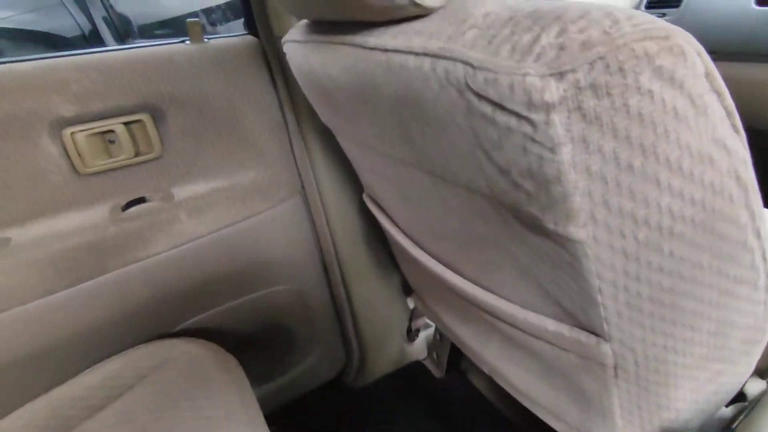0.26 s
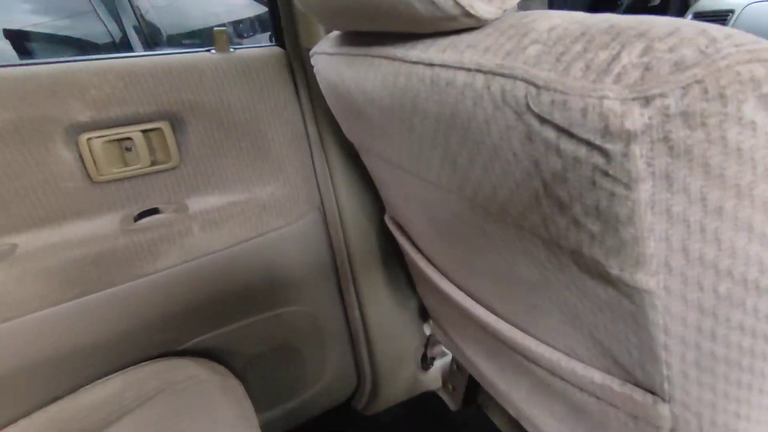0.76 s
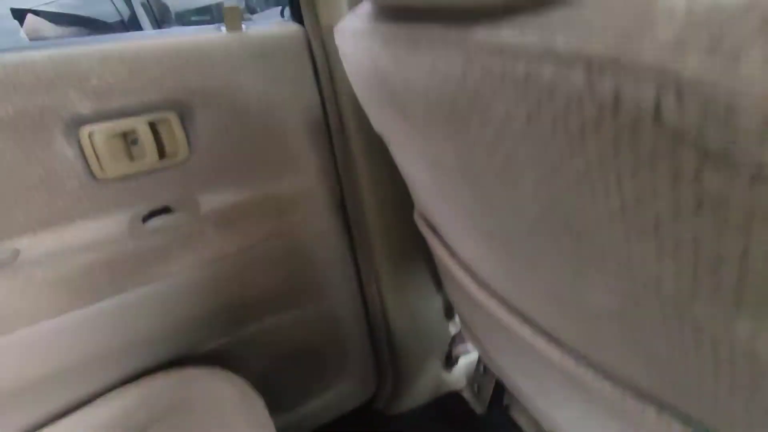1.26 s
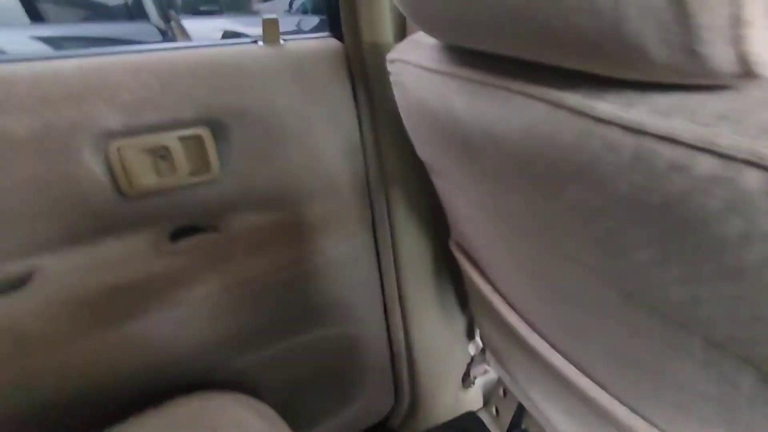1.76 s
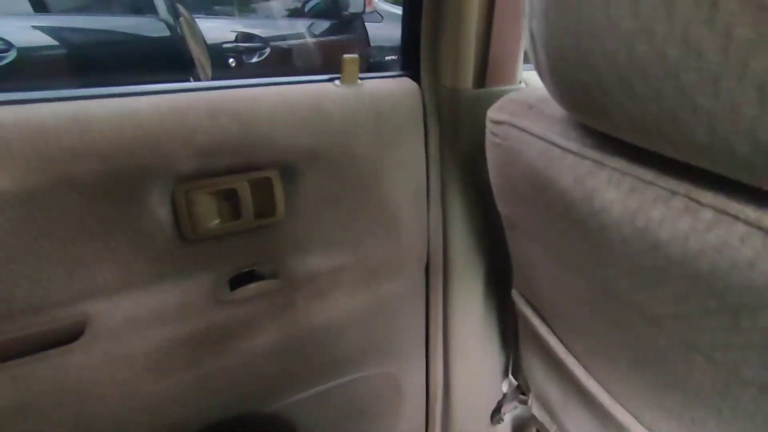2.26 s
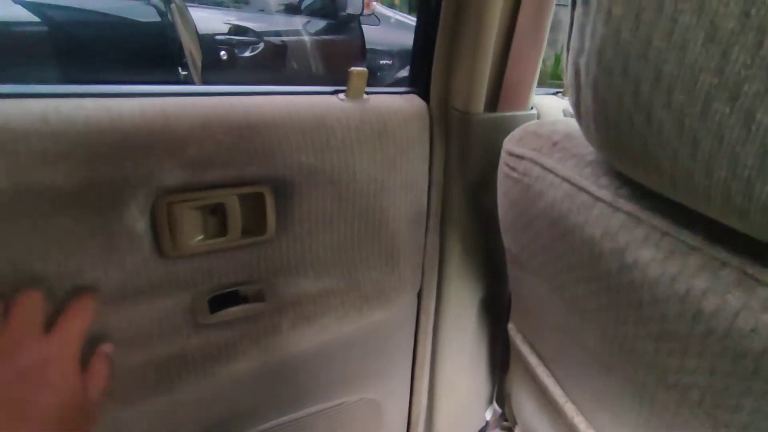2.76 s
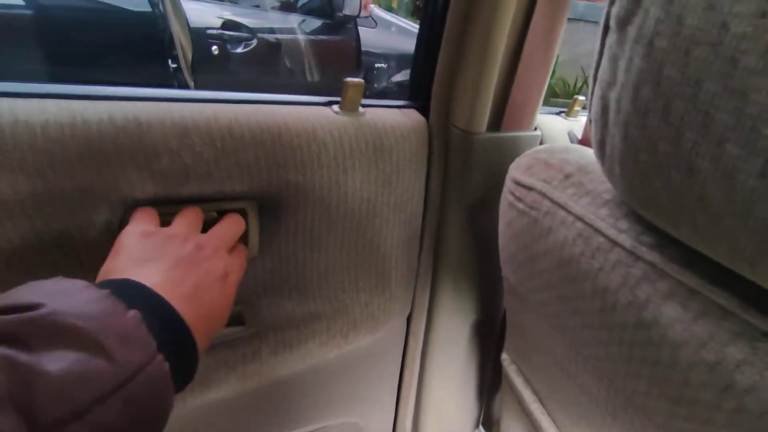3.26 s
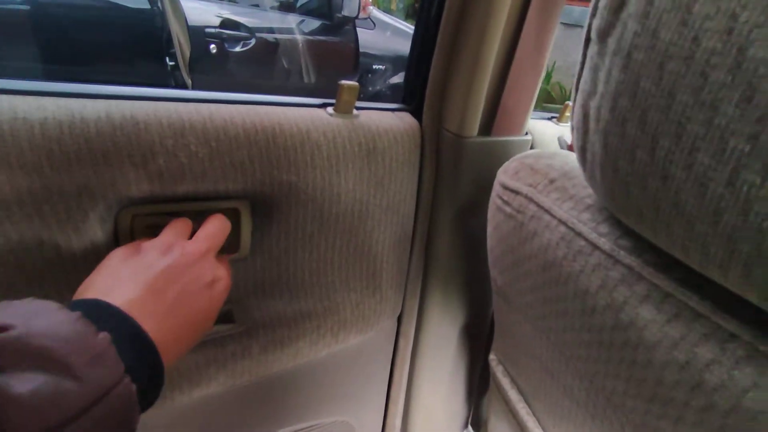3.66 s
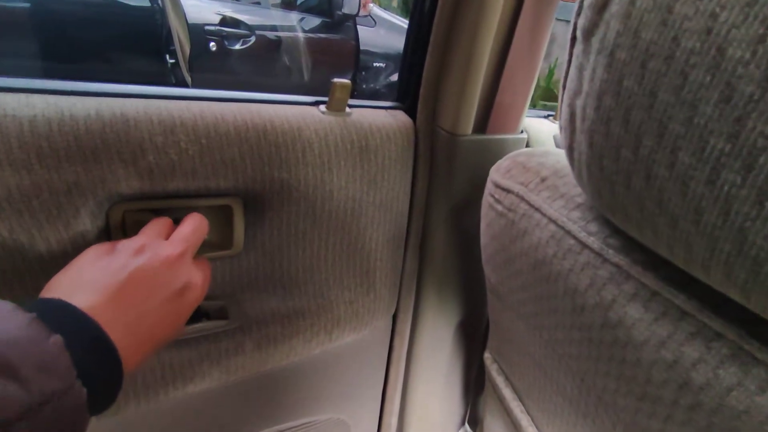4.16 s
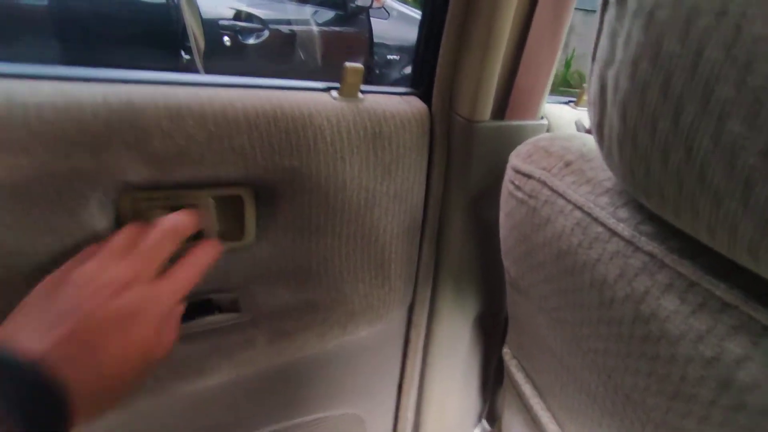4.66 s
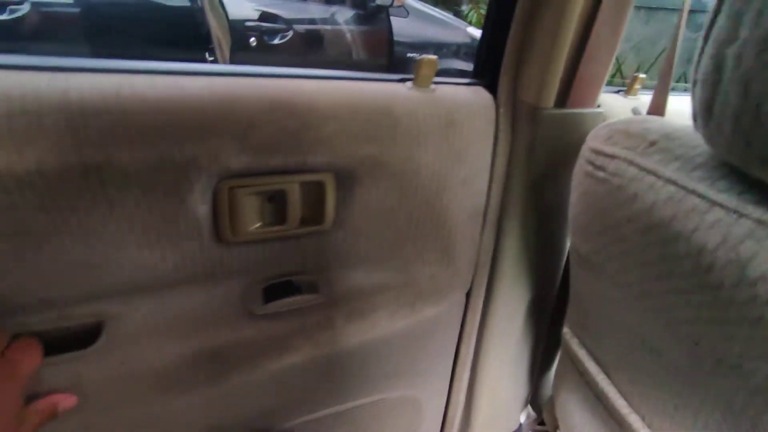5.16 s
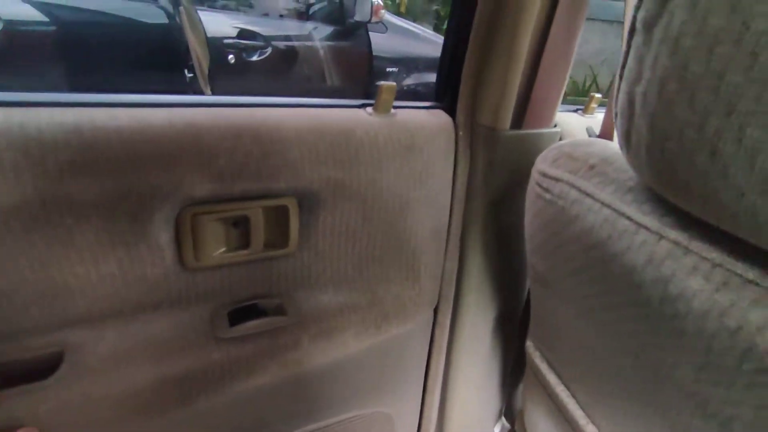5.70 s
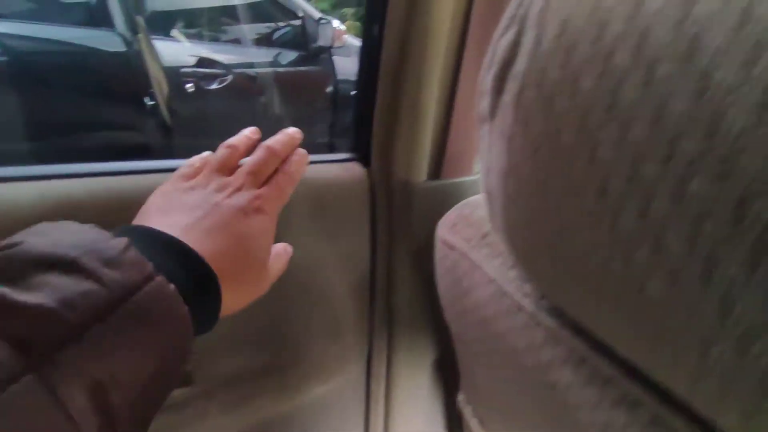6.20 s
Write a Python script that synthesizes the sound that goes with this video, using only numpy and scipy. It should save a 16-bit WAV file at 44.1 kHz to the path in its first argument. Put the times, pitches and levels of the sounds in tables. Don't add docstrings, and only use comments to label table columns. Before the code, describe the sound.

Inside a parked car, cloth rustles and keys jingle faintly, a door handle clicks and creaks, then the door thuds shut over low rumble.

```python
import sys
import numpy as np
from scipy import signal
from scipy.fft import rfft, irfft, next_fast_len
from scipy.io import wavfile
from scipy.ndimage import uniform_filter1d, map_coordinates

SR = 44100
rng = np.random.default_rng(int(sys.argv[2]) if len(sys.argv) > 2 else 0)


def invert_db(level):
    return 10 ** (np.asarray(level, dtype=float) / 20)


def int16_out(signal):
    q = np.round(np.clip(np.atleast_2d(signal).T, -1, 1) * 32767)
    wavfile.write(sys.argv[1], SR, q.astype(np.int16))


N = 283871

# frequency in Hz, level in dB, decay time t60 in seconds.
DOOR_MODES = [
    [(90.85, 2.5, 0.86), (101.8, -3.5, 1), (134, -39, 0.26)],
    [(140.6, 1.5, 0.96), (164.9, 6.5, 0.94)],
    [(227.5, 6.5, 0.62), (303, -17, 0.32), (323, -0.5, 0.46), (363, 10.5, 0.089)],
    [(26.24, 5.5, 1.34), (32.7, 4, 0.77), (48.7, -16, 0.53)],
]
# start in seconds, frame level in dB, hardness in dB, cabin air in dB.
SEAT_SHIFTS = [
    (0.097, -46, -1, -6),
    (0.123, -45.5, -32, 10.5),
    (0.645, -61.5, 8.5, 1),
    (0.892, -49.5, -11.5, 6),
    (1.409, -43.5, -18, 8.5),
    (1.797, -53.5, -21, 14),
    (2.254, -42.5, -14, 11),
]
# start in seconds, frame level in dB, hardness in dB, cabin air in dB.
DOOR_PUSHES = [(2.84, -43.5, -9.5, -1), (3.119, -58, 7, -7), (3.518, -47.5, -2, 3),
               (4.001, -41.5, -13, 4.5), (4.045, -41, 1, -11), (4.272, -41, -8, -26), (4.458, -46.5, -2, 3),
               (4.51, -45, 0.5, -5), (4.619, -51.5, 1.5, 3), (4.92, -56.5, 1.5, -4), (5.104, -50, -13, 11),
               (5.169, -47.5, -0.3, 19.5), (5.455, -38.5, -25, 4), (5.487, -32.5, -3.9, -8),
               (5.499, -42, -11, 5), (5.549, -39, -9, 8), (5.772, -39.5, -2, -2), (5.921, -22, -24, -2.5),
               (5.961, -33.5, -21, -2.5), (6.239, -61.5, 3.5, -8)]
# start in seconds, level in dB, frequency in Hz, t60 in seconds.
DOOR_PULLS = [
    (5.477, -3, 23.3, .22),
    (6, -14, 26.3, 0.21),
]
# frequency in Hz, level in dB, decay time t60 in seconds.
SLAM_MODES = [
    [(26.4, -18, 1.44), (33.4, -4, 0.33), (48.6, -29.5, 0.15)],
    [(86.4, -22.5, 0.718), (95.7, -18, 0.34), (143, -33, 0.59), (172, -26, 0.4), (226.8, -34, 0.36),
     (332, -39.5, 0.18)],
]
# frequency in Hz, level in dB, decay time t60 in seconds.
STRIKER_MODES = [(604, -35, .15), (785, -33.5, 0.067), (924, -45.5, 0.16), (1174, -52, .15),
                 (1414, -47, .12), (1840, -45, 0.1), (2078, -51, .08)]
# start in seconds, peak in dB, panel in dB, air in dB.
KNUCKLE_KNOCKS = [(0.824, -44, -15, -16), (1.9643, -41, 0, 0), (1.969, -43, 1, -8), (1.9985, -43, -1, -7),
                  (2.0035, -46, 3, -10), (2.009, -48.5, 2, -12), (1.9743, -41.5, 0, -8),
                  (2.2495, -44.5, -3, -14), (3.2046, -46, -18, -23), (3.3562, -47, 2.5, -18),
                  (3.4208, -55, 9, -28), (3.5022, -51.5, -1.5, -17), (3.711, -46.5, 1, -19),
                  (3.7855, -48.5, -26, -3), (3.9983, -47.5, 4, -18), (4.0395, -53.5, 12, -36.5),
                  (4.0481, -55, 18, -27), (4.1264, -59, 15, -33), (4.1398, -67, 12, -30),
                  (4.5171, -47.5, -4, -1), (4.562, -49, 1.5, -6), (5.6128, -49, -8, -28),
                  (5.8193, -47.5, 1.5, -14), (5.8474, -32, -0.5, -23), (5.875, -47, -4, -16)]
# start in seconds, peak in dB, ring in Hz, air in dB.
NAIL_TICKS = [(0.0921, -36.5, 2830, 7.5), (0.0955, -32.5, 2780, -4), (0.889, -40, 3640, -25),
              (0.9443, -46, 3960, -17), (1.1133, -38, 3690, -23), (1.4114, -42.5, 2980, -25),
              (1.9543, -44, 3150, -4), (1.991, -38, 2000, 0), (2.251, -37.5, 3640, -13),
              (2.7053, -52, 2950, -18), (3.2295, -50, 3367, -28), (3.295, -41, 2830, 5),
              (3.3005, -36, 4330, -19), (3.483, -36, 5100, -23), (3.8332, -47.5, 2130, -2),
              (3.9656, -34, 4260, -11), (4.1724, -53, 3230, -29), (4.4095, -41, 2290, -31),
              (4.6266, -40, 3980, -20), (4.6382, -31.5, 3703, 3.5), (5.1735, -45, 4030, -22),
              (5.243, -52, 3597, -28), (5.2854, -57, 3970, -28), (5.4783, -36.5, 2060, -23),
              (5.488, -41, 3520, -20), (5.88, -43, 3420, -30)]
# start in seconds, peak in dB, pitch in Hz, decay time t60 in seconds.
HOLLOW_TAPS = [(0.052, -44, 1350, 0.032), (0.0943, -30, 526, 0.09), (.096, -32.5, 830, .02),
               (0.1536, -36.5, 1200, 0.03), (.1598, -41, 1300, 0.046), (.345, -52, 550, 0.024),
               (.372, -49, 550, .04), (1.309, -31.5, 1190, 0.02), (1.309, -42, 2680, .03),
               (1.3154, -32, 1200, 0.02), (1.3188, -33, 1180, 0.028), (1.321, -43, 4000, .03),
               (1.9913, -42, 1100, .03), (1.9987, -40, 1060, .02), (2.001, -38, 2200, 0.03),
               (2.102, -49.5, 1610, .03), (3.199, -38.5, 305, 0.22), (4.0916, -44, 2040, 0.039),
               (4.192, -49.5, 1780, .03), (4.228, -40, 1460, .06), (4.241, -40, 1100, 0.038),
               (4.2545, -40, 800, .03), (4.2595, -39, 840, .05), (4.283, -41, 651, 0.056),
               (4.307, -43, 600, .03), (4.563, -46, 1750, 0.2), (5.456, -50, 1800, 0.069),
               (5.477, -38, 2000, 0.071), (5.476, -44, 950, .05), (5.617, -52, 850, .04),
               (5.786, -51, 1800, .05), (5.821, -46, 1100, 0.041), (5.8215, -46, 580, 0.046),
               (5.848, -34.5, 715, 0.07), (5.97, -50, 450, 0.08), (4.503, -50, 2100, .06),
               (3.36, -47, 900, 0.065), (3.973, -49, 850, .04), (4.143, -43, 900, .03),
               (4.176, -49, 2200, .04), (4.646, -42, 500, .12), (1.336, -46, 1650, .02),
               (3.483, -48, 2100, .03)]
# frequency in Hz, width in Hz, level in dB.
PANEL_PEAKS = [(292, 42, -1.5), (410, 18.5, -2.5), (550, 82, -6.5), (760, 72, -8.5), (914, 88, -9.5),
               (1100, 106, -10), (1428, 270, -9), (2130, 450, -15.5)]
# start in seconds, level in dB,
# frequency in Hz, decay time t60 in seconds.
FREE_RINGS = [
    (1.3195, -58, 9060, .1),
    (1.3085, -51, 8226, .034),
    (4.642, -50, 560, .08),
]
# start in seconds, peak in dB, panel in dB.
SPRING_SLIPS = [
    (4.2232, -29, -1.5),
    (4.2359, -36.5, 0),
    (4.2543, -34.5, -4),
    (4.2777, -47, -11),
    (4.3016, -46, -16),
    (4.3206, -42.5, -6),
    (4.3314, -43, -21),
    (4.341, -42, -12),
]
# frequency in Hz, width in Hz, level in dB.
SPRING_PEAKS = [(4140, 500, 0), (4950, 700, 0), (5700, 700, -2)]
# start and hold in seconds, level and edge in dB, fall in dB per second.
DRAGS = [(1.962, 0.023, -64, 4, 500), (3.194, 0.036, -55.5, -13.5, 600), (3.997, 0.1, -62, -5, 300),
         (4.039, 0.0044, -49.5, -13, 450), (4.136, 0.0071, -49.5, -19.5, 900), (4.227, .02, -49, -20, 600),
         (4.25, 0.075, -51.5, -19, 300), (4.33, 0.077, -53.5, -18, 500), (4.517, 0.011, -60, -8, 600),
         (4.565, 0.0077, -66, -3, 300), (4.641, 0.0036, -44, -11.5, 425), (5.165, 0.051, -63, -14, 204),
         (5.478, 0.011, -48, -10, 282), (5.853, 0.0035, -40.5, -10.5, 448)]
# time in seconds, slips per second, level in dB.
HINGE_MOTION = [(4.3, 190, -73), (4.32, 188, -50), (4.345, 188, -47), (4.37, 197, -47), (4.395, 203, -47),
                (4.415, 210, -56), (4.435, 220, -73)]
# frequency in Hz, width in Hz, level in dB.
HINGE_PEAKS = [(400, 90, -2), (600, 147, -1), (795, 156, -0.5), (1800, 520, -20)]
# start in seconds, crack in dB, ring in dB, best rung frequency in Hz.
KEY_HITS = [
    (0.351, -51, -5, 8600),
    (0.6697, -44.5, 0.5, 10500),
    (1.308, -41, 5.5, 6850),
    (1.315, -34, -3, 6250),
    (1.9913, -41, 6, 13500),
    (1.999, -27.5, -8, 5640),
    (2.0285, -29.5, -4, 11800),
    (2.1034, -43, -2, 11600),
    (2.104, -43, 2.5, 5300),
]
# frequency in Hz, width in Hz, level in dB.
BRASS_PEAKS = [
    [(5330, 580, 0)],
    [(8190, 690, -7), (8550, 110, -4)],
    [(12080, 520, 0)],
    [(13500, 980, 9), (12500, 110, -13)],
]
# time in seconds, pressure in dB, speed in dB.
CLOTH_MOTION = [(0, -59.5, -61.5), (.2, -65.5, -59), (.36, -64, -69), (.6, -71, -61), (.76, -65.5, -71),
                (1, -60.5, -63.5), (1.25, -60.5, -57.5), (1.59, -59, -64), (1.92, -65, -61),
                (2.08, -70, -67), (2.37, -65.5, -62), (2.7, -70, -68.5), (3.14, -67, -67), (3.5, -66, -77),
                (4.9, -67, -70.5), (6, -67, -73.5), (6.25, -68, -64), (6.44, -70.5, -74.5)]
# frequency in Hz, density in dB per Hz.
RUB_SPECTRUM = [(88, -24.5), (150, -5.5), (200, 4.5), (391, 2), (737, -5), (1100, -7.5), (1430, -73),
                (2420, -120)]
SWISH_SPECTRUM = [(470, -72), (800, -5.5), (1130, -3), (1350, 1.5), (1750, -3.5), (3130, -8.5), (6000, -17),
                  (7800, -84), (13200, -120)]
FIZZ_SPECTRUM = [(2650, -1.5), (4500, -7), (4830, -7.5), (5720, -7), (10100, -14), (13700, -14),
                 (14500, -6), (14800, -8)]
# time in seconds, level in dB.
CABIN_SWING = [(0, -49.5), (.3, -53), (.6, -54.5), (.9, -44.5), (1.2, -47), (1.6, -43.5), (2.1, -51),
               (2.5, -47.5), (3, -50.5), (3.6, -51.5), (4.1, -52), (4.28, -59), (4.45, -52), (4.9, -50.5),
               (6.44, -50.5)]
# frequency in Hz, density in dB per Hz.
BOOM_SPECTRUM = [(8, -20), (18, 22.5), (30, 8), (45, 17), (70, -44.5)]
RUMBLE_SPECTRUM = [(24, -5.5), (40, 7), (49, -0.5), (135, -8.5), (199, -22), (260, -25), (340, -51),
                   (570, -120)]
# start in seconds, hold in seconds, level in dB.
INSECT_CALLS = [
    (3.39, .26, -86),
    (5.92, 0.24, -86.5),
]
# time in seconds, firing rate in Hz, load in dB.
ENGINE_RUN = [(.8, 30.2, -35), (1.5, 29.45, -5.5), (2.3, 27.18, -1), (3, 25.86, 3), (3.3, 26.38, 4),
              (3.55, 26.87, 7), (3.66, 25.73, -21), (3.95, 25.63, -2.5), (4.2, 25.24, -8.5),
              (4.4, 24.38, 7), (4.75, 24.23, 3.5), (5.1, 23.99, -2), (5.45, 23.61, 4.5), (6.44, 22.8, -2.5)]
# frequency in Hz, level in dB.
SHELL_LEAK = [(46, -52.5), (54, -51.5), (64, -69), (82, -61), (96, -52), (106, -60.5), (128, -55.5),
              (150, -80.5)]
# frequency in Hz, correlation from -1 to 1.
PORT_LIKENESS = [(60, 0.98), (130, 0.98), (290, 0.71), (630, 0.5), (1370, -0.26), (3000, -0.01),
                 (6570, 0.04), (14400, 0.04)]
# frequency in Hz, left minus right in dB.
PORT_COLOUR = [(60, 0.0), (110, 0.5), (200, 0.0), (370, 1.0), (680, 1.5), (1260, -2.5), (2310, -2.5),
               (4250, -5.0), (7810, 2.5), (14400, 4.0)]

SLAM_S = 5.8465


def unit(x):
    return x / np.sqrt(np.mean(x ** 2) + 1e-20)


def along(points, hz):
    f, value = np.transpose(points)
    return np.interp(np.log(hz + 1), np.log(f + 1), value)


def curves(rows):
    s, *columns = np.transpose(rows)
    return [np.interp(np.arange(N) / SR, s, column) for column in columns]


def wobble(rate):
    knots = rng.standard_normal(int(N * rate / SR) + 4)
    return map_coordinates(knots, [np.arange(N) * rate / SR])


def stroke(s, hold, rise, fall):
    t = np.arange(N) / SR - s
    return np.minimum(0, np.minimum(rise * t, fall * (hold - t)))


def filtered(x, response):
    m = next_fast_len(x.shape[-1] + 4096)
    return irfft(rfft(x, m) * response(np.fft.rfftfreq(m, 1 / SR)), m)[..., :x.shape[-1]]


def body(peaks):
    def response(f):
        total = 0
        for k, (hz, width, db) in enumerate(peaks):
            damping = 1j * f * width
            total = total + (-1) ** k * invert_db(db) * damping / (hz * hz - f * f + damping)
        return total
    return response


def resonance(hz, width, stages):
    single = body([(hz, width, 0)])
    return lambda f: single(f) ** stages


def ports(pair):
    def mid_side(hz):
        turn = np.arccos(np.clip(along(PORT_LIKENESS, hz), -1, 1)) / 2
        return np.array([np.cos(turn), np.sin(turn)])
    mid, side = filtered(pair, mid_side)
    return np.array([mid + side, mid - side])


def lean(db):
    return invert_db(np.array([[db / 2], [-db / 2]]))


def rush(spectrum, patchy_db):
    z = signal.stft(rng.standard_normal((2, N)), nperseg=512)[2]
    field = rng.standard_normal(z.shape[1:])
    field = uniform_filter1d(uniform_filter1d(field, 8, 0), 8, 1)
    pair = signal.istft(z * invert_db(patchy_db * unit(field)), nperseg=512)[1][:, :N]
    return unit(filtered(pair, lambda hz: invert_db(along(spectrum, hz))))


def puff(t60, response, click=0.9):
    t = np.arange(SR // 8) / SR
    fade = invert_db(-60 * t / max(t60, 0.003)) + 1.2 * invert_db(-60 * t / 0.0054)
    impulse = click * np.linalg.norm(fade) * (t == 0)
    contact = filtered(impulse, lambda f: np.outer([1, 1j], response(f)))
    x = contact + filtered(rng.standard_normal((2, len(t))) * fade, response)
    return x / np.abs(x).max()


def ring(modes, t, stretch=1, scatter=1):
    total = 0
    for hz, db, t60 in modes:
        level = invert_db(db + rng.normal(0, 1.5) - 60 * t / (t60 * stretch))
        total = total + level * np.sin(2 * np.pi * (hz * t + scatter * rng.random((2, 1))))
    return total


def swell(t, tau):
    return 1 - np.exp(-t / tau)


def add(track, s, x):
    part = track[:, round(s * SR):][:, :x.shape[1]]
    part += x[:, :part.shape[1]]


def door_blows():
    out, t = np.zeros((2, N)), np.arange(SR) / SR
    rises = [swell(t, tau) for tau in (0.0035, 0.0031, 0.0035, 0.013)]
    blows = [(s, db, hard - 10, hard, air) for s, db, hard, air in SEAT_SHIFTS]
    blows += [(s, db, hard, hard - 5, air) for s, db, hard, air in DOOR_PUSHES]
    for s, db, skin_db, trim_db, air_db in blows:
        parts = zip([0, skin_db, trim_db, air_db], rises, DOOR_MODES)
        rings = sum(invert_db(g) * rise * ring(modes, t, 0.29, scatter=0.21) for g, rise, modes in parts)
        add(out, s, invert_db(db - 1) * rings)
    return out


def door_pulls():
    out, t = np.zeros((2, N)), np.arange(SR) / SR
    for s, db, hz, t60 in DOOR_PULLS:
        add(out, s, -swell(t, 0.03) * ring([(hz, db, t60)], t, scatter=0))
    return out


def slam():
    out, t = np.zeros((2, N)), np.arange(SR) / SR
    air, steel = (ring(modes, t, scatter=0) for modes in SLAM_MODES)
    add(out, SLAM_S, invert_db(-2) * (swell(t, 0.018) * air - swell(t, 0.0053) * steel))
    return out


def small_steel():
    out, t = np.zeros((2, N)), np.arange(SR // 4) / SR
    add(out, SLAM_S + 0.003, ring(STRIKER_MODES, t))
    for s, db, hz, t60 in FREE_RINGS:
        add(out, s, ring([(hz, db, t60)], t))
    return out


def handle_ticks():
    out, air = np.zeros((2, N)), resonance(5000, 4700, 2)
    ticks = [(s, db, 1685, panel_db, air_db) for s, db, panel_db, air_db in KNUCKLE_KNOCKS]
    ticks += [(s, db, hz, -9.5, air_db) for s, db, hz, air_db in NAIL_TICKS]
    for s, db, hz, panel_db, air_db in ticks:
        pitched, broad = resonance(hz, 0.7 * hz, 4), resonance(2800, 5000, 2)
        plastic = puff(0.064, lambda f: pitched(f) + invert_db(-9.0) * broad(f))
        panel = invert_db(panel_db + 1.5) * puff(0.12, body(PANEL_PEAKS))
        spit = invert_db(air_db - 1.5) * puff(0.044, air)
        add(out, s, invert_db(db) * (plastic + panel + spit))
    return out


def hollow_taps():
    out = np.zeros((2, N))
    for s, db, hz, t60 in HOLLOW_TAPS:
        add(out, s, invert_db(db) * puff(t60, resonance(hz, 0.26 * hz, 2), click=2.5))
    return out


def spring_slips():
    out = np.zeros((2, N))
    air, steep, thud = resonance(5000, 4700, 2), resonance(4900, 3500, 2), resonance(1700, 3000, 4)
    for k, (s, db, panel_db) in enumerate(SPRING_SLIPS):
        spring = puff(0.024, lambda f: body(SPRING_PEAKS)(f) * steep(f))
        spit = invert_db(-2.5 - 2.5 * k) * puff(0.031, air)
        panel = invert_db(panel_db) * puff(0.067, thud)
        add(out, s, invert_db(db) * (spring + spit + panel))
    return out


def scrape():
    low, edge = resonance(760, 750, 1), resonance(3050, 1800, 2)
    drag = rng.standard_normal((2, N)) * invert_db(1.6 * wobble(260))
    hum = unit(filtered(drag, lambda f: body(PANEL_PEAKS)(f) * low(f)))
    hiss = unit(filtered(drag, edge))
    out = np.zeros((2, N))
    for s, hold, db, edge_db, fall in DRAGS:
        grip = invert_db(stroke(s, hold, 1104, fall))
        edge_grip = invert_db(stroke(s, hold, 1104, fall + 123.5))
        out += invert_db(db) * (grip * hum + invert_db(edge_db + 2.0) * edge_grip * hiss)
    return out


def creak():
    rate, db = curves(HINGE_MOTION)
    phase = np.cumsum(rate) / SR + 0.045 * wobble(150)
    slips = np.diff(np.floor(phase), prepend=0) > 0
    force = slips * invert_db(3 * wobble(200))
    shape = lambda f: np.outer([1, 1j], body(HINGE_PEAKS)(f))
    return filtered(force * invert_db(db), shape) / np.std(filtered(force, shape))


def keys():
    out = np.zeros((2, N))
    for s, db, ring_db, best_hz in KEY_HITS:
        hit = 0.81 * puff(0.04, resonance(0.75 * best_hz, 8000, 1))
        for peaks in BRASS_PEAKS:
            octaves_off = abs(np.log2(peaks[0][0] / best_hz))
            piece = puff(0.068, lambda f: body(peaks)(f) ** 2)
            hit = hit + invert_db(ring_db - 3 - 22 * octaves_off) * piece
        add(out, s, invert_db(db) * hit)
    return out


def cloth():
    rub_db, fizz_db = curves(CLOTH_MOTION)
    swish_db = 0.5 * rub_db + 0.5 * fizz_db - 0.63
    catch, lumps = wobble(28), wobble(35)
    rub = invert_db(rub_db + 4.14 * lumps + 0.9 * catch) * rush(RUB_SPECTRUM, patchy_db=0)
    swish = invert_db(swish_db + 1.0 * catch) * rush(SWISH_SPECTRUM, patchy_db=1.7)
    fizz = invert_db(fizz_db + 2.0 * catch) * rush(FIZZ_SPECTRUM, patchy_db=1.5)
    return rub + swish + fizz


def cabin():
    swing_db, = curves(CABIN_SWING)
    gap = np.interp(np.arange(N) / SR, [3.65, 3.65 + 0.1, 5.85, 5.85 + 0.1], [0, 1, 1, 0])
    boom = invert_db(swing_db) * rush(BOOM_SPECTRUM, patchy_db=-1)[0]
    rumble = invert_db(swing_db - 4 + 5 * gap) * rush(RUMBLE_SPECTRUM, patchy_db=2.5)
    return boom, rumble


def insect():
    calls = sum(invert_db(db + stroke(s, hold, 150, 150)) for s, hold, db in INSECT_CALLS)
    return calls * rush([(6900, -40), (7450, 2), (8000, -38)], patchy_db=1)


def engine():
    hz, load_db = curves(ENGINE_RUN)
    turns = np.cumsum(hz) / SR
    near_db = stroke(ENGINE_RUN[0][0], N / SR, 69, 60)
    out = 0
    for order, follow in zip(range(2, 6), [1, 0.2, 1, 0.2]):
        db = along(SHELL_LEAK, order * hz) + load_db * follow + near_db
        level = invert_db(db + 2.8 * wobble(6.5))
        out = out + level * np.sin(2 * np.pi * order * turns + 0.88 * wobble(3.3))
    return np.sqrt(2) * out


def scene():
    thuds = door_blows() + door_pulls() + slam()
    hand = handle_ticks() + hollow_taps() + small_steel() + spring_slips() + scrape() + creak()
    boom, rumble = cabin()
    lead = lambda hz: np.exp(np.outer([1, -1], 1j * np.pi * hz * 0.00028))
    bass = filtered(boom + engine() + thuds[0], lead)
    room = ports(rumble + insect() + cloth() + 0.41 * (thuds - thuds[0]))
    return bass + room + lean(-2) * ports(hand) + lean(1.5) * ports(keys())


def low_pass(x):
    return signal.sosfilt(signal.butter(12, 14960, fs=SR, output="sos"), x)


def record(dry):
    edge = lambda hz: 1 / (1 + (hz / 14250) ** 80)
    colour = lambda hz: invert_db(np.outer([0.5, -0.5], along(PORT_COLOUR, hz)))
    mix = filtered(dry, lambda hz: edge(hz) * colour(hz))
    return low_pass(mix)


dry = scene()
out = record(dry)
int16_out(out)
```